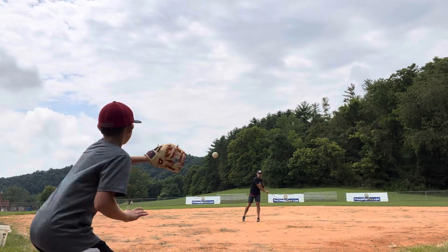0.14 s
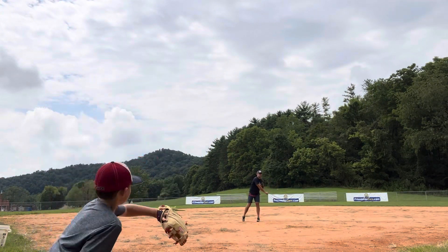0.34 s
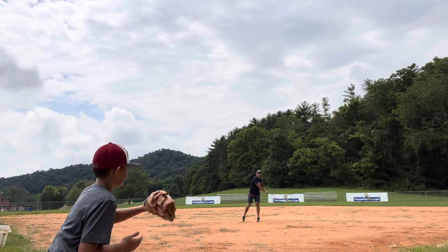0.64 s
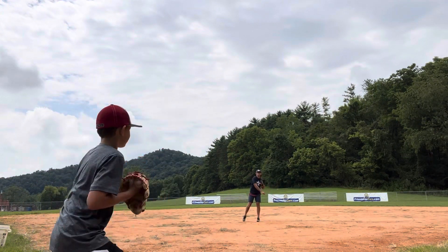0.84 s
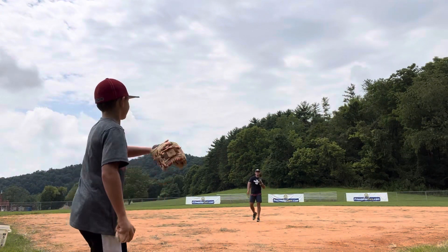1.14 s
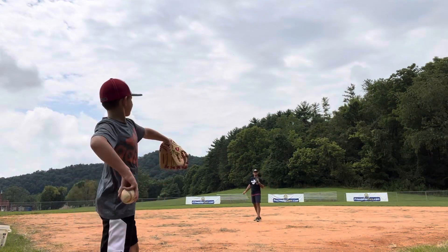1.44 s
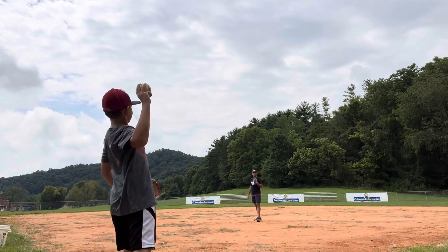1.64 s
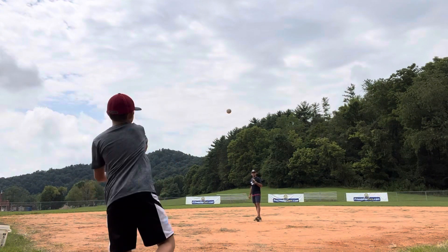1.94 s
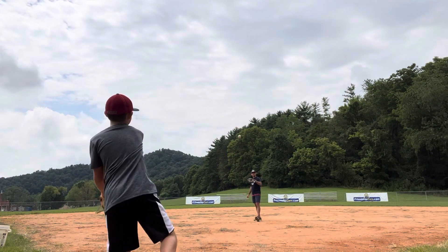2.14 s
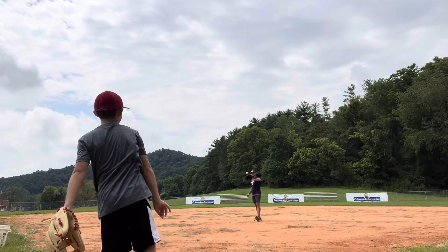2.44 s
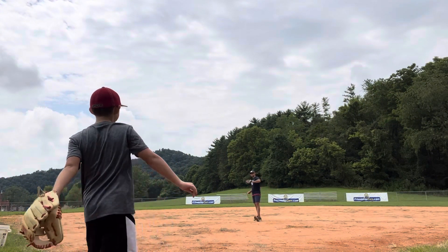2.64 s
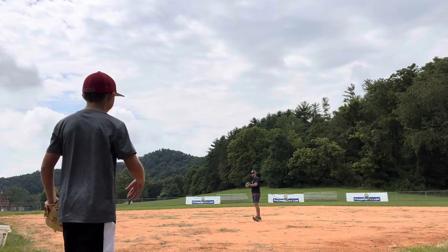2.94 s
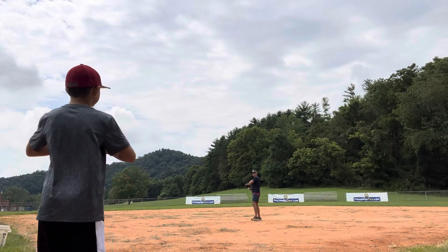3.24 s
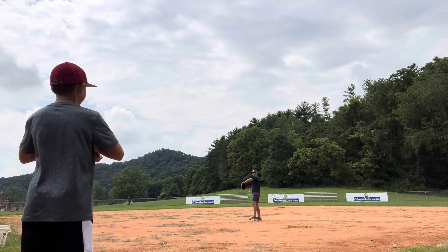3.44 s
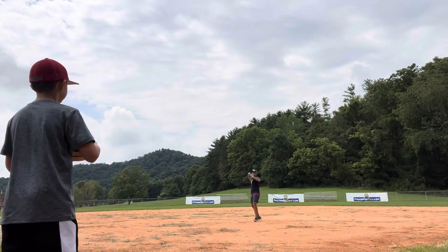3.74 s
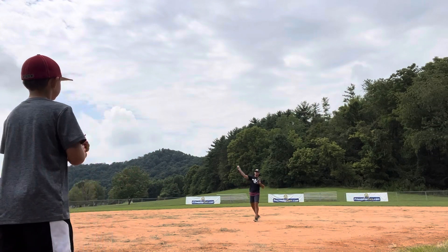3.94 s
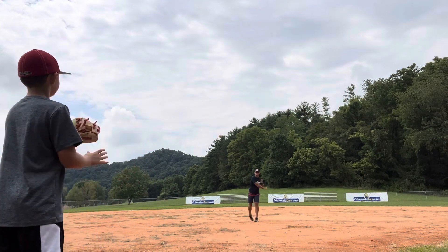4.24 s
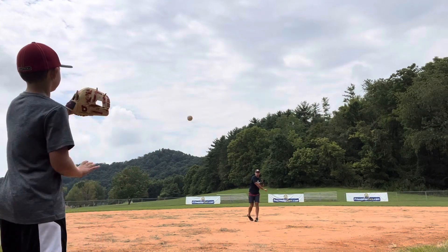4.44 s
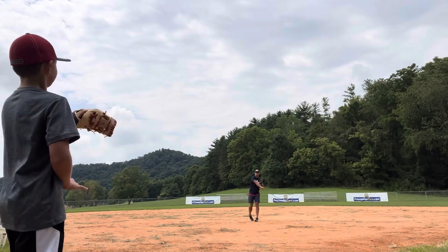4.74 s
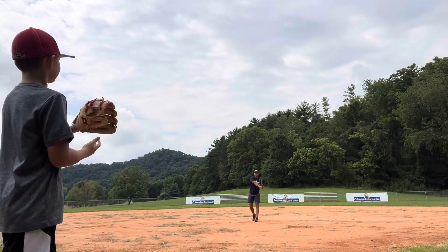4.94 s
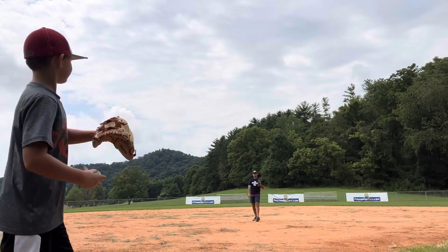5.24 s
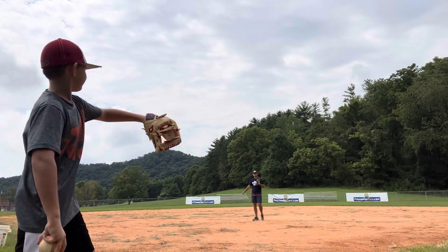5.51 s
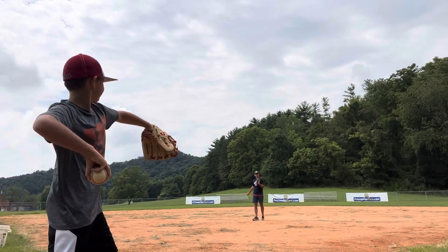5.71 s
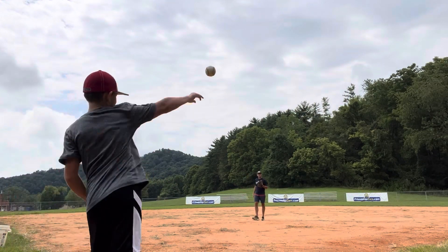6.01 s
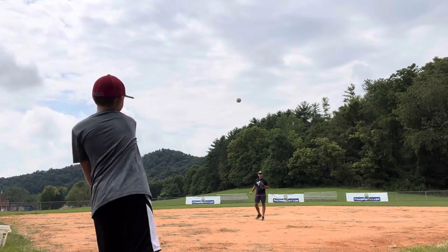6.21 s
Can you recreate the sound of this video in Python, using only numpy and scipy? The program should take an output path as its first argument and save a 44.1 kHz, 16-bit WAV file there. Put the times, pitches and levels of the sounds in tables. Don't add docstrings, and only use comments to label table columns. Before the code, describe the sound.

Outdoor game of catch: a ball slaps leather three times close by, gritty footsteps and pebble ticks between, low motor rumble behind.

```python
import sys
import numpy as np
from scipy import signal
from scipy.fft import rfft, irfft, next_fast_len
from scipy.io import wavfile
from scipy.ndimage import uniform_filter1d

SR = 44100
rng = np.random.default_rng(int(sys.argv[2]) if len(sys.argv) > 2 else 0)


def persist_wave(psi):
    counts = np.round(np.clip(psi, -1, 1) * 32767).astype(np.int16)
    wavfile.write(sys.argv[1], SR, np.atleast_2d(counts).T)


def decibels_to_gain(level_db):
    exponent = np.asarray(level_db, float) / 20
    return 10 ** exponent


N = 280958
T = np.arange(N) / SR

# start_s, firing_hz, first_order_db, second_order_below_first_db
ENGINE_COURSE = [(0.0, 61, -42.5, 24), (0.2, 65.4, -43, 8), (0.38, 65.85, -40, 17.5),
                 (0.78, 65.3, -46.5, 13), (0.87, 64.6, -41, 13), (1.15, 66.5, -42.5, 14),
                 (1.23, 64.34, -55, 10), (1.45, 63.53, -41, 17), (1.96, 64.02, -45.5, 10),
                 (2.0, 63.87, -39, 20), (2.5, 60.47, -36, 16), (2.55, 61.7, -31, 15.5),
                 (3.37, 61.44, -34, 10.5), (3.58, 61.65, -31, 15.5), (4.2, 60.3, -39, 10.5),
                 (5.25, 59.71, -33.5, 12), (5.75, 59.94, -29.5, 12.5), (6.37, 59.97, -41.5, 12.5)]


def rms_one(x):
    return x / np.sqrt(np.mean(x ** 2) + 1e-20)


def in_time(rows, silent_db=None):
    s, *columns = np.transpose(rows)
    return [np.interp(T, s, c, silent_db, silent_db) for c in columns]


def drift(rate):
    r = np.exp(-80 * np.pi * rate / SR)
    slow = signal.lfilter([1], [1, -2 * r, r * r], rng.standard_normal(N // 40 + 2002))
    slow = slow[2000:]
    return np.interp(np.arange(N) / 40, np.arange(len(slow)), rms_one(slow))


def coloured(x, spectrum, low_hz=10, high_hz=20000):
    size = next_fast_len(N)
    hz = np.arange(size // 2 + 1) * SR / size + 1
    edges = 1 / np.sqrt((1 + (low_hz / hz) ** 4) * (1 + (hz / high_hz) ** 4))
    curve_hz, curve_db = np.transpose(spectrum)
    gain = decibels_to_gain(np.interp(np.log(hz), np.log(curve_hz), curve_db))
    return irfft(rfft(x, size) * gain * edges, size)[..., :N]


def stereo(mid, side):
    return np.array([mid + side, mid - side])


def tone(hz, db, wobble_db, wobble_rate, lead=0.):
    phase = 2 * np.pi * np.cumsum(hz) / SR + rng.uniform(0, 2 * np.pi)
    phase = phase + 0.022 * wobble_db * drift(wobble_rate)
    apart = lead + 0.2 * drift(17.0)
    level = np.sqrt(2) * decibels_to_gain(db + wobble_db * drift(wobble_rate))
    return level * np.sin([phase + apart, phase - apart])


def air():
    # pitch_hz, level_db (per Hz)
    mid_spectrum = [(20, -26.5), (45, 0.5), (90, 0.5), (160, -5.5), (300, -17), (550, -20), (900, -14.5),
                    (1600, -22), (2300, -24.5), (2700, -30), (4500, -34), (8000, -33), (9500, -81.5),
                    (14500, -50), (16500, -66.5)]
    side_spectrum = [(20, -29), (60, -4), (160, -10), (400, -23), (900, -10.5), (1500, -16.5), (2500, -29),
                     (4500, -33), (8500, -35.5), (11000, -61), (14500, -48), (16500, -64.5)]
    engine_swing_db = uniform_filter1d(in_time(ENGINE_COURSE)[1], size=SR // 2) + 38
    rumble_db = -48.5 + .35 * engine_swing_db
    hiss_db = -56.5
    white = rng.standard_normal((4, N))
    out = 0
    # level, low edge Hz, high edge Hz, drift rate
    layers = [(rumble_db, 10, 300, 3), (hiss_db, 300, 20000, 6)]
    for k, (level_db, low_hz, high_hz, rate) in enumerate(layers):
        mid = coloured(white[2 * k], mid_spectrum, low_hz, high_hz)
        side = coloured(white[2 * k + 1], side_spectrum, low_hz, high_hz)
        out = out + decibels_to_gain(level_db + .9 * drift(rate)) * stereo(mid, side) / np.std(mid)
    return out


def engine():
    # multiple, level_db (re second order)
    upper_orders = [(3, -11.5), (4, -17.5)]
    hz, first_db, below_db = in_time(ENGINE_COURSE)
    second_db = first_db - below_db
    out = tone(hz, first_db, 0.62, 8.4, lead=0.07)
    out += tone(2 * hz, second_db, 1.7, 13, lead=0.28)
    out += sum(tone(k * hz, second_db + db, 2.0, 5) for k, db in upper_orders)
    return out * decibels_to_gain(np.array([[-1.1], [1.1]]))


def far_machines():
    # start_s, mesh_hz, level_db (common to all its harmonics)
    whine = [(3.15, 424.6, -89), (3.25, 427, -59.5), (3.7, 431.5, -61.5), (4.25, 443.5, -64),
             (5.0, 447, -67), (5.4, 447, -75)]
    # multiple, level_db
    whine_orders = [(2, 4), (3, -6), (4, -9.5), (6, -12)]
    motor_hz = 103.9 + 1.724 * T + 1.23 * drift(2.5)
    throb_db = 6.5 * np.cos(2 * np.pi * (T - 1.124) / 0.44)
    motor_db = -52.5 + throb_db - 40 * np.clip((T - 2.5) / 0.28, 0, 1)
    out = tone(motor_hz, motor_db, 2.9, 16)

    fan_db = -66.5 - 25 * np.clip((T - 2.1) / 0.37, 0, 1)
    out += tone(np.full(N, 291.5), fan_db, 1.3, 2.3)

    mesh_hz = in_time(whine)[0] + 2.24 * drift(4.5)
    whine_db = in_time(whine, silent_db=-120)[1] + 1.1 * drift(6.0)
    for k, level_db in whine_orders:
        out = out + tone(k * mesh_hz, whine_db + level_db + 1.5, 3.5, 35, lead=.8)
    return out


def insects():
    # centre_hz, width_hz, mid_db, side_db
    choirs = [(7084, 650, -2, -0.5), (5240, 520, -9.5, -6)]
    upper_db, lower_db = (-60.5, -68.5)
    lower_db = lower_db + 4 * np.cos(2 * np.pi * (T - 2.15) / 1.52)
    out = 0
    for (hz, width, mid_db, side_db), level_db in zip(choirs, (upper_db, lower_db)):
        clicks = rng.standard_normal((2, N)) * decibels_to_gain(0.69 * np.array([drift(120), drift(120)]))
        band = signal.butter(2, [hz - width / 2, hz + width / 2], "band", fs=SR, output="sos")
        mid, side = (rms_one(v) for v in signal.sosfilt(band, clicks))
        out = out + decibels_to_gain(level_db + .4 * drift(9.0)) * stereo(decibels_to_gain(mid_db) * mid, decibels_to_gain(side_db) * side)
    return out


def scuff_levels():
    # peak_s, crunch_db, build_up_s, dying_s, sand_hiss_below_crunch_db
    steps = [(.098, -49.5, 0.0095, 0.075, 22), (0.186, -38.5, 0.067, .11, 16.5),
             (0.151, -41.5, 0.0065, 0.13, 21), (.835, -49.5, 0.019, 0.028, 11),
             (.924, -39.5, .006, 0.15, 11.5), (0.971, -38.5, 0.13, 0.065, 18),
             (1.035, -37.5, .006, 0.15, 13.5), (1.206, -49, 0.019, 0.053, 17),
             (1.398, -42.5, 0.016, 0.09, 12.5), (1.556, -49.5, 0.016, 0.026, 20),
             (1.61, -49.5, 0.03, 0.23, 3), (1.765, -53.5, .012, 0.12, 18), (2.54, -35, 0.015, 0.038, 15),
             (2.605, -52, .09, 0.29, 10), (2.729, -44.5, 0.018, 0.051, 19),
             (3.206, -49.5, 0.0058, 0.052, 23), (4.474, -55, 0.62, 0.21, 22),
             (4.632, -35.5, .012, 0.046, 15), (4.677, -48.5, 0.043, 0.15, 10), (4.88, -52.5, .17, 0.19, 15),
             (5.657, -51.5, 0.014, 0.14, 26), (5.724, -46.5, 0.029, 0.036, 12),
             (5.831, -42.5, 0.0087, .03, 13), (5.907, -48, 0.053, 0.17, 10.5)]
    levels = np.full((2, N), -120.)
    for s, db, rise_s, fall_s, below_db in steps:
        building = (s - T) / max(rise_s, .002)
        dying = (np.maximum(T - s, 0) / max(fall_s, .002)) ** 1.22
        shape = db - 25.5 * np.maximum(building, dying)
        levels = np.maximum(levels, [shape, shape - below_db])
    return levels


def stones(grains):
    pitches = np.geomspace(440, 2160, num=12)
    dealt = rng.integers(12, size=N)
    out = 0
    for k, hz in enumerate(pitches):
        r = decibels_to_gain(-60 * hz / 8.7 / SR)
        w = 2 * np.pi * hz / SR
        struck = grains * (dealt == k) + 1e-18
        out = out + signal.lfilter([0, np.sin(w)], [1, -2 * r * np.cos(w), r * r], struck)
    return rms_one(out)


def scuffs():
    # pitch_hz, level_db (per Hz)
    mid_spectrum = [(88, -37), (150, -15), (1240, -10.5), (2550, -17.5), (4320, -19.5), (5050, -25),
                    (7770, -26), (9080, -31), (10400, -69), (14500, -36.5), (16000, -46.5)]
    side_spectrum = [(88, -16.5), (150, -22.5), (334, -8.5), (624, 1), (871, -13), (1040, -6.5),
                     (7180, -15.5), (14500, -25.5), (16000, -45)]
    crunch_db, sand_db = scuff_levels()
    # level, low edge Hz, high edge Hz, grains per s, side dB, has stones
    layers = [(crunch_db, 230, 2200, 1800, -9, True), (sand_db, 2200, 20000, 9000, 1.5, False)]
    out = 0
    for level_db, low_hz, high_hz, per_s, side_db, has_stones in layers:
        sizes = decibels_to_gain(3.5 * np.minimum(rng.exponential(1, (2, N)), 4))
        sizes = sizes * rng.choice([-1, 1], (2, N))
        grains = sizes * (rng.random((2, N)) < per_s * decibels_to_gain(3.5 * drift(60)) / SR)
        mid = rms_one(coloured(grains[0], mid_spectrum, low_hz, high_hz))
        if has_stones:
            mid = rms_one(mid + decibels_to_gain(-4.5) * stones(grains[0]))
        side = rms_one(coloured(grains[1], side_spectrum, low_hz, high_hz))
        level = uniform_filter1d(decibels_to_gain(level_db + 2.26), size=130)
        out = out + level * stereo(mid, side * decibels_to_gain(side_db))
    return out


def ticks():
    # start_s, peak_db, ring_hz
    knocks = [(.102, -41, 458), (.153, -38, 545), (.191, -50, 1160), (0.213, -42, 450), (.831, -46, 488),
              (0.876, -43, 1077), (1.046, -45, 916), (1.103, -36, 1043), (1.512, -42.5, 911),
              (1.556, -41.5, 1060), (1.763, -47, 1144), (1.788, -38.5, 1600), (2.607, -59, 776),
              (2.729, -50, 520), (2.96, -45, 607), (3.234, -57, 562), (3.335, -55, 873), (3.389, -53, 860),
              (3.652, -47, 840), (4.249, -57, 900), (.128, -39, 260), (4.852, -44, 557), (4.88, -38.5, 950),
              (4.994, -47, 688), (.176, -40, 1080), (5.655, -56, 1149), (5.72, -44, 1017),
              (5.788, -40.5, 1300), (5.829, -35.5, 980), (5.902, -49, 563)]
    out = np.zeros((2, N))
    t = T[:3000]
    draws = rng.standard_normal((len(knocks), 3001))
    for (s, db, hz), draw in zip(knocks, draws):
        rough = 1 + .5 * rms_one(signal.lfilter([1], [1, -.93], draw[1:]))
        fade = decibels_to_gain(-60 * t / .016) * (1 - np.exp(-t / 0.0001))
        ring = rough * np.sin(2 * np.pi * hz * t) * fade
        click = signal.lfilter(*signal.butter(2, 2800, fs=SR), draw[:0:-1])
        click = click * decibels_to_gain(-3 - 60 * t / .006)
        treble = 1.2 * np.diff(click, prepend=0)
        balance_db = draw[0] * np.array([[1], [-1]])
        at = round(s * SR)
        out[:, at:at + 3000] += decibels_to_gain(db + 3 + balance_db) * stereo(ring + click, treble)
    return out


def slaps():
    # start_s, peak_db, t60_s, side_db, off_axis_share_db
    hits = [
        (.2982, -15, .008, -12, -25),
        (.301, -19, .03, -12, -30),
        (.3073, -9, .005, -8, -22),
        (.3089, -7, .006, -8, -22),
        (.3103, -15, .025, -10, -22),
        (.3245, -30, .012, -6, -20),
        (.3296, -30, .008, -3, -4),
        (2.5215, -21, .014, -4, -22),
        (2.5232, -12.5, .004, -1, -20),
        (4.6147, -9, .009, 2, -16),
    ]
    # pitch_hz, level_db (per Hz)
    mid_spectrum = [(900, 1.5), (1800, -21), (3500, -8), (5000, -14.5), (6800, -8), (8700, -16.5),
                    (10500, -60), (12500, -14), (15000, -35), (16600, -9)]
    side_spectrum = [(880, -52), (1500, -49), (2130, 20), (2550, -54), (5750, -3), (8340, -21), (13000, -8),
                     (16500, -30)]
    mid = rms_one(coloured(rng.standard_normal(N), mid_spectrum))
    side, oblique = rms_one(coloured(rng.standard_normal((2, N)), side_spectrum))
    out = np.zeros((2, N))
    for s, db, t60, side_db, oblique_db in hits:
        near = slice(round(s * SR), round(s * SR) + 2000)
        t = T[near] - T[near][0]
        shape = decibels_to_gain(-60 * t / t60) * (1 - np.exp(-t / .00012))
        centre = mid[near] + decibels_to_gain(oblique_db) * oblique[near]
        burst = shape * stereo(centre, decibels_to_gain(side_db) * side[near])
        out[:, near] += decibels_to_gain(db) * burst / np.abs(burst).max()
    return out


def pops():
    # start_s, peak_db, start_hz, end_hz, swell_ms
    pulses = [(.2984, -19, 3600, 2600, .6), (.2997, -11.5, 1050, 580, 1.3), (.3071, -7.5, 1650, 1400, .6),
              (.3079, -9, 690, 660, 3.1), (.3085, -23, 480, 200, 2.5), (.3087, -8, 2300, 2000, .5),
              (.3089, -14, 4800, 4200, .5), (.3101, -13.5, 3700, 3350, .6), (.3165, -27, 130, 80, 6.0),
              (2.5222, -22, 3600, 3350, .9), (2.52345, -6.5, 1600, 1120, .68),
              (2.5236, -16, 2250, 2050, .9), (2.5256, -10.5, 850, 95, 2.5), (2.5295, -25, 130, 85, 6.0),
              (4.615, -19, 2150, 1980, .7), (4.6151, -5, 1500, 850, .72), (4.6152, -18, 2850, 2720, 1.0),
              (4.6152, -9, 520, 480, 1.75), (4.6153, -13, 1650, 1280, 1.0)]
    # start_s, peak_db, start_hz, swell_ms
    creaks = [
        (1.0462, -24, 900, 1.1),
        (3.138, -49, 520, 9.0),
        (5.655, -42, 1350, 6.0),
        (5.682, -44, 1000, 3.5),
        (5.827, -39, 1150, 3.0),
    ]
    # time_s, left_lead_ms
    glove = [
        (.3, 0),
        (1.05, .05),
        (2.52, -.09),
        (4.615, .1),
        (5.6, 0),
    ]
    voices = [(*pulse, 6.4) for pulse in pulses]
    voices += [(s, db, hz, .82 * hz, ms, np.inf) for s, db, hz, ms in creaks]
    out = np.zeros((2, N))
    for s, db, start_hz, end_hz, swell_ms, choke in voices:
        near = slice(round(s * SR) - 40, round(s * SR) + 3000)
        lead_ms = np.interp(s, *np.transpose(glove))
        t = np.maximum(T[near] - s + np.array([[1], [-1]]) * lead_ms / 2000, 0)
        tau = swell_ms / 1000
        cycles = end_hz * t + (start_hz - end_hz) * tau * (1 - np.exp(-t / tau))
        swell = t / tau * np.exp(1 - t / tau - (cycles / choke) ** 6)
        out[:, near] -= decibels_to_gain(db) * swell * np.sin(2 * np.pi * cycles)
    return out


def birds():
    # time_s, pitch_hz, level_db
    whistle = [
        (3.86, 6050, -85),
        (3.89, 5700, -69),
        (3.93, 5420, -68),
        (3.99, 5300, -67),
        (4.09, 5500, -69),
        (4.12, 5550, -85),
    ]
    # start_s, level_db
    chirps = [(.47, -69), (1.43, -72), (2.3, -69), (2.74, -70), (3.01, -68), (3.43, -72), (3.97, -72),
              (5.11, -71), (5.38, -69), (6.04, -76), (6.31, -68)]
    # after_s, pitch_hz, level_db
    chirp_shape = [
        (0, 3650, -12),
        (.015, 3950, -4),
        (.035, 4280, -3),
        (.07, 4200, -9),
        (.12, 4150, -22),
    ]
    whistle_hz = in_time(whistle)[0]
    whistle_db = in_time(whistle, silent_db=-120)[1]
    song = []
    for s, level_db in chirps:
        for after, hz, fall_db in chirp_shape:
            song.append((s + after, hz, level_db + fall_db))
    chirp_hz, chirp_db = in_time(song)
    singing = np.min([np.abs(T - s - .06) for s, level_db in chirps], axis=0) <= .06
    out = tone(whistle_hz, whistle_db, 1.5, 20, lead=1.3)
    return out + singing * tone(chirp_hz, chirp_db, 4.0, 90, lead=1.1)


def scene():
    far = air() + engine() + far_machines() + insects() + birds()
    near = scuffs() + ticks() + slaps() + pops()
    return far + near


def band_limit(x):
    return signal.sosfilt(signal.butter(12, 17170, fs=SR, output="sos"), x)


def record(dry):
    # start_s, end_s
    dropouts = [
        (0.0085, 0.032),
        (0.0505, 0.073),
    ]
    muted = sum((T > a) & (T < b) for a, b in dropouts)
    gain = uniform_filter1d(np.where(muted, decibels_to_gain(-38), 1.), size=60)
    rounded = 1.5 * np.tanh(dry * gain / 1.5)
    top_cut = signal.cheby2(20, 60, 17200, fs=SR, output="sos")
    return band_limit(signal.sosfilt(top_cut, rounded))


dry = scene()
out = record(dry)
persist_wave(out)
```